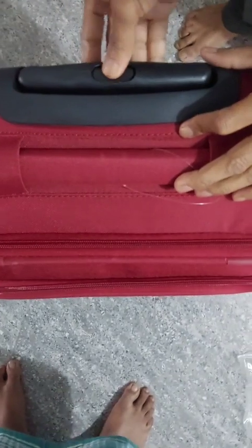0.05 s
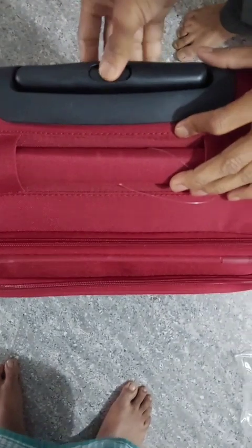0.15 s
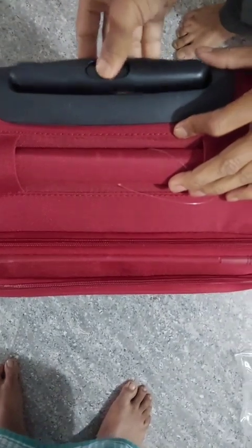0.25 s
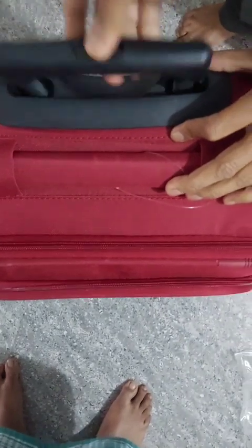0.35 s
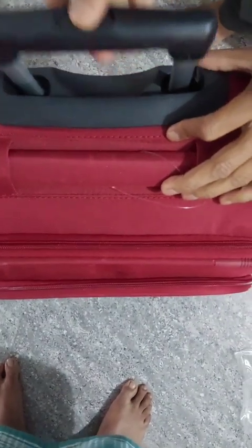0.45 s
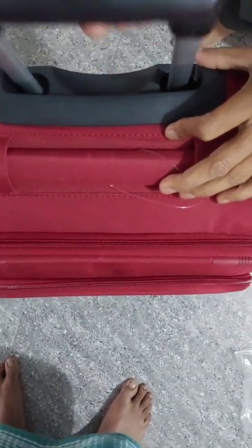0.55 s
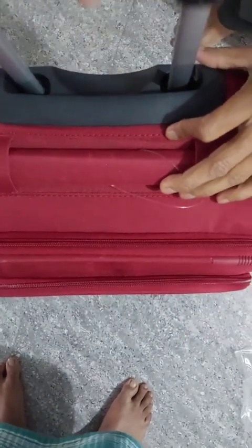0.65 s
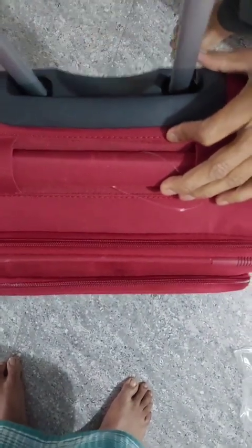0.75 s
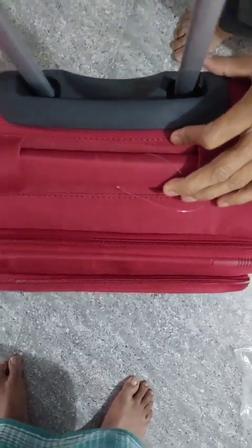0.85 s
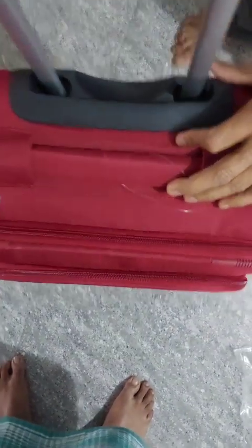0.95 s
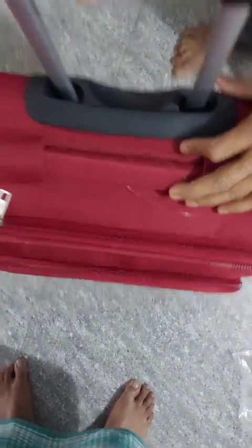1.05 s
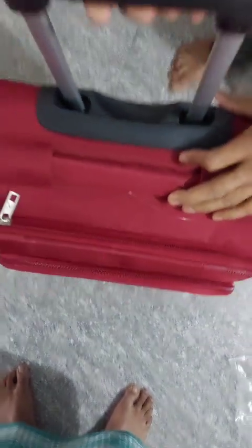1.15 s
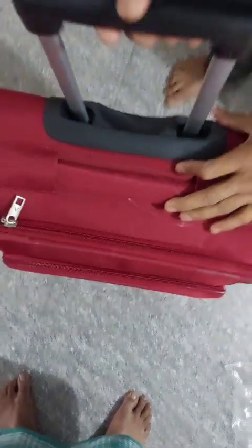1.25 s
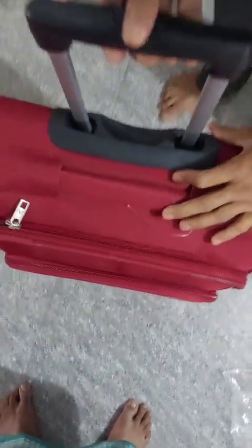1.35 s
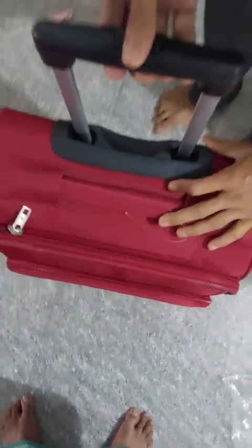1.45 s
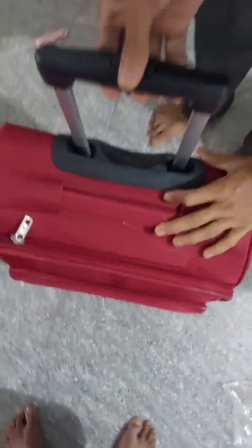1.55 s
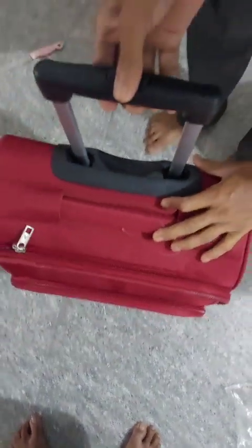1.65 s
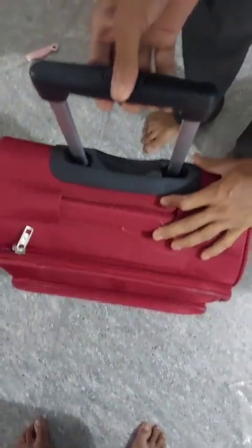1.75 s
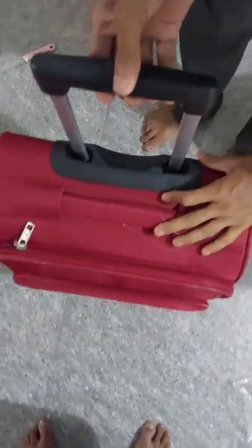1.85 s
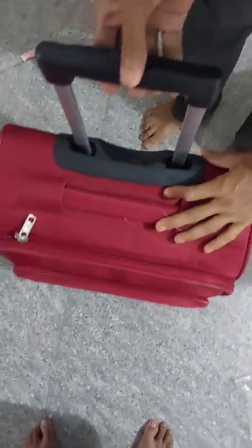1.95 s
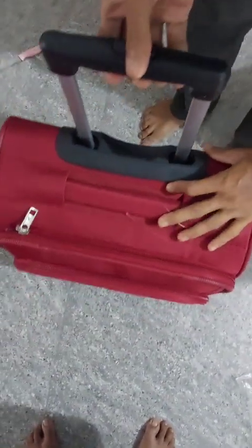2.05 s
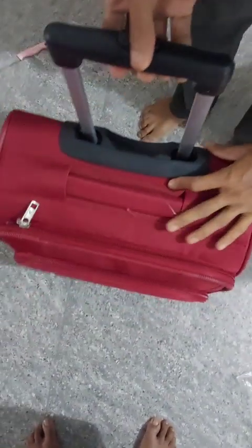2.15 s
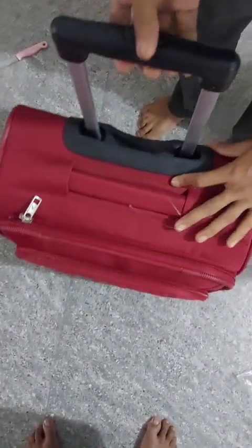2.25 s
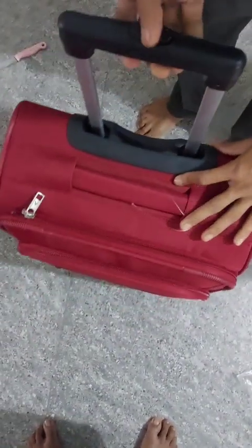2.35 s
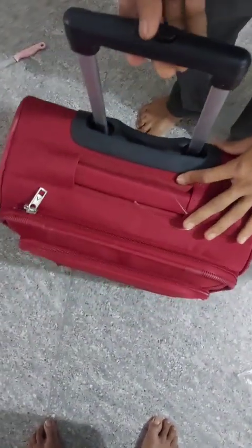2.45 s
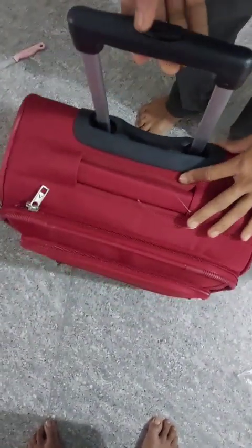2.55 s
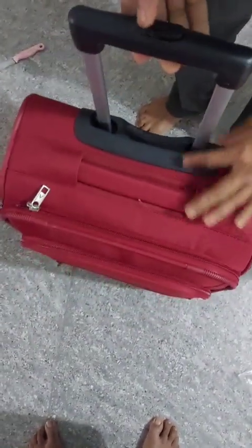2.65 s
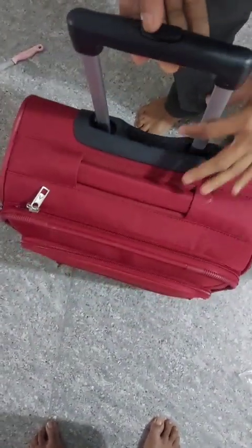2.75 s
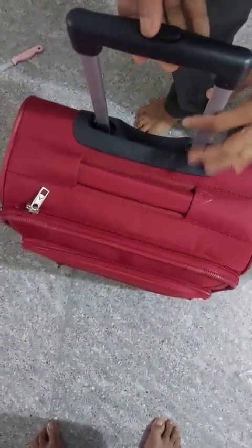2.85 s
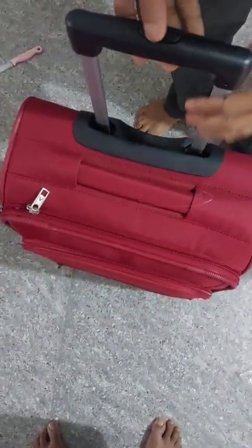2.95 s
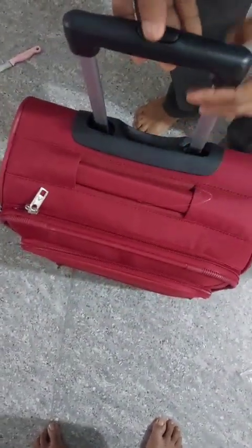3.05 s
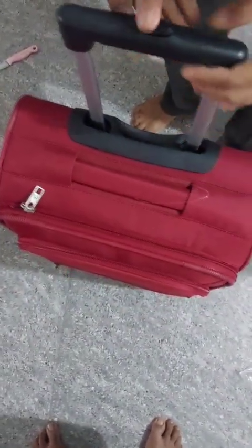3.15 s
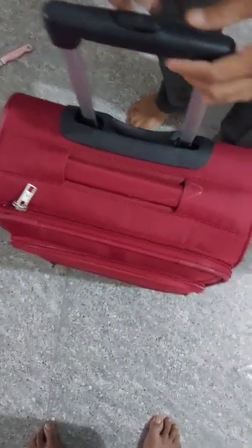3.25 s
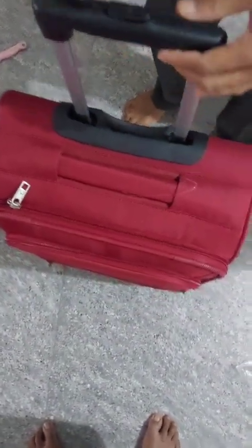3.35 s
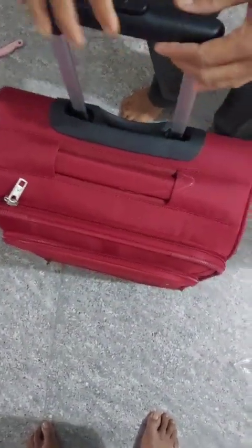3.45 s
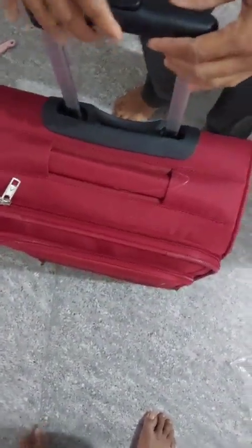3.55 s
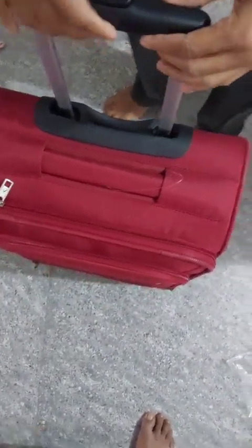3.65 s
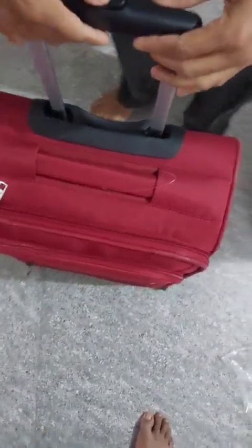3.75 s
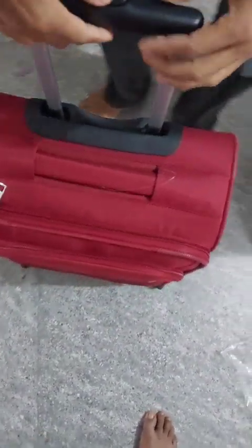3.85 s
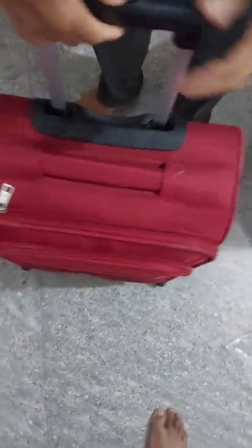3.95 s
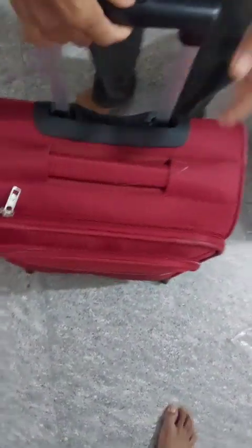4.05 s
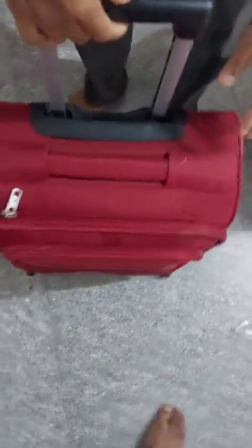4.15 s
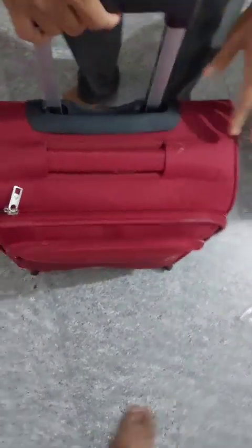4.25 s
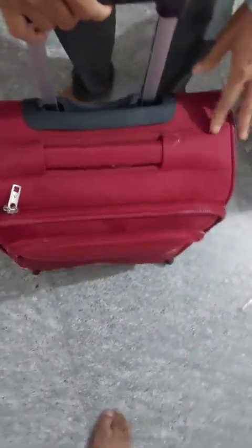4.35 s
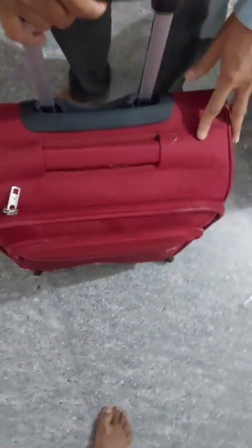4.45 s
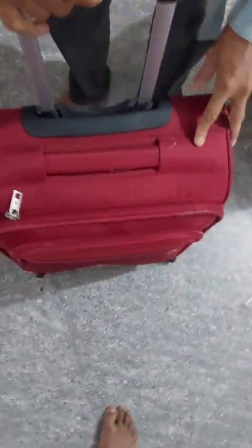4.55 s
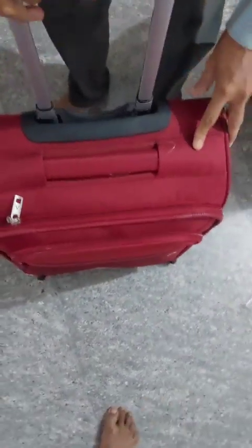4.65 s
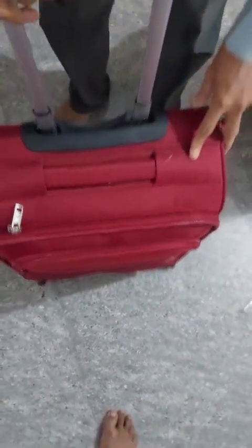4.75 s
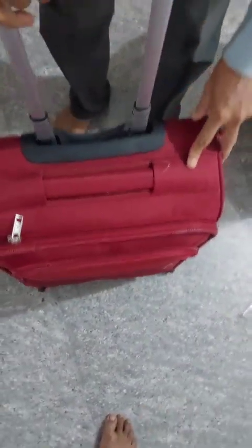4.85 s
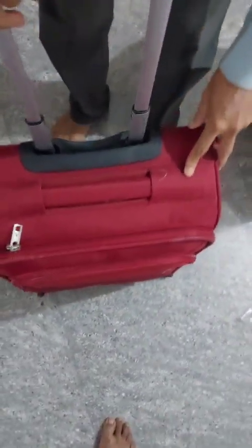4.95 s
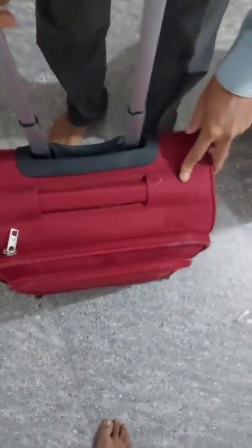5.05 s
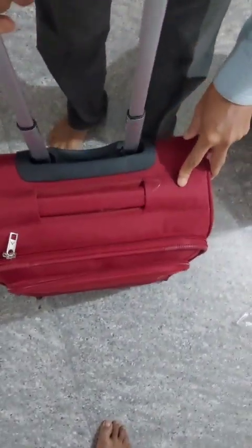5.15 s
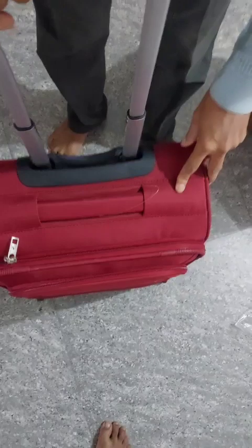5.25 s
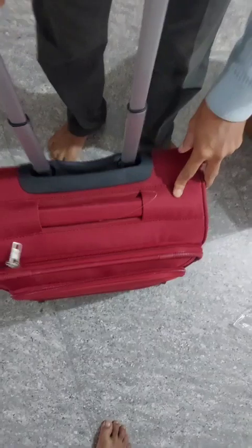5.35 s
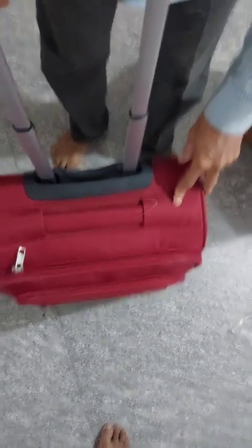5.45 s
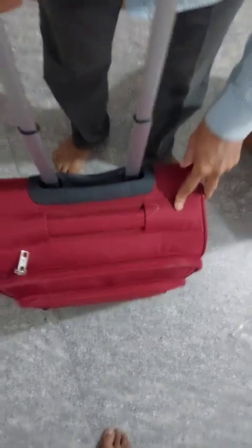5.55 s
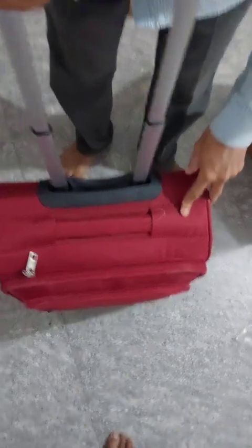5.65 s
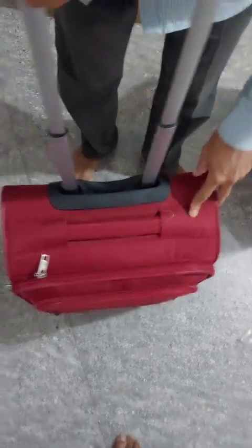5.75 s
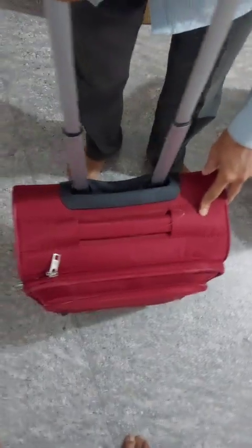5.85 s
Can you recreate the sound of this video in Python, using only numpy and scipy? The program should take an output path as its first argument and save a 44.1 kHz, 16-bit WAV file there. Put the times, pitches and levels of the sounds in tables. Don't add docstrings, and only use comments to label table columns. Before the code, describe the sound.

Close handling of a soft suitcase indoors: sliding tubes, sharp ringing clacks, quiet cloth rubbing, faint creaks, a short squeal and a rattling lock.

```python
import sys
import numpy as np
from scipy import signal
from scipy.fft import rfft, irfft
from scipy.io import wavfile
from scipy.ndimage import uniform_filter1d, map_coordinates

SR = 44100
rng = np.random.default_rng(int(sys.argv[2]) if len(sys.argv) > 2 else 0)


def gain_from_decibels(decibels):
    exponent = np.asarray(decibels, float) / 20
    return 10 ** exponent


def store_pcm(level_fs):
    pcm = np.round(np.clip(level_fs, -1, 1) * 32767).astype(np.int16)
    wavfile.write(sys.argv[1], SR, np.atleast_2d(pcm).T)


N = 259308
T = np.arange(N) / SR


def unit(x):
    return x / np.sqrt(np.mean(x ** 2))


def band(x, low_hz, high_hz):
    return signal.sosfilt(signal.butter(2, [low_hz, min(high_hz, .45 * SR)], "band", fs=SR, output="sos"), x)


def ring(x, modes):
    out, power = 0, 0
    for hz, width_hz, db in modes:
        b, a = signal.iirpeak(hz, hz / width_hz, fs=SR)
        out = out + gain_from_decibels(db) * signal.lfilter(b, a, x)
        power += gain_from_decibels(2 * db) * np.pi * width_hz / SR
    return out / np.sqrt(power)


def decay(t, t60_s):
    return np.exp(-np.log(1000) * t / t60_s)


def alike(noise, share):
    share = np.clip(share, 0, 1)
    return np.array([np.sqrt(share) * noise[1] + np.sqrt(1 - share) * noise[0], noise[1]])


def walk(rate_hz):
    k = int(SR / rate_hz)
    return uniform_filter1d(np.repeat(rng.standard_normal(N // k + 1), k), k)[:N]


def stroke(start, length, attack_s, release_db_s):
    gain = np.zeros(N)
    span = (T > start - attack_s) & (T < start + length + 70 / release_db_s)
    since = T[span] - start
    rise = np.clip(1 + since / attack_s, 0, 1) ** 2
    gain[span] = rise * gain_from_decibels(-release_db_s * np.clip(since - length, 0, 1))
    return gain


# frequency in Hz, density in dB per Hz.
AIR = [(15, -47), (25, -7.5), (70, 3.5), (270, -5.5), (796, -14), (962, -13), (2840, -21.5), (7710, -37.5),
       (9070, -26), (12500, -12.5), (16000, -29)]


def air():
    hz = np.maximum(np.fft.rfftfreq(N, 1 / SR), 1)
    table_hz, table_db = np.transpose(AIR)
    colour = gain_from_decibels(np.interp(np.log(hz), np.log(table_hz), table_db))
    colour = colour / (1 + (hz / 1500) ** 2) ** .25
    mid, side = rfft(rng.standard_normal((2, N)))
    side = side * np.clip(hz / 420.0, .7, 1)
    return gain_from_decibels(-70) * unit(irfft(colour * np.array([mid + side, mid - side]), N))


# start in seconds, length in seconds, scrape level in dB,
# extra cloth hiss in dB, extra weight on the case in dB.
SLIDES = [
    (.27, 0.1, -56.5, 0, 7),
    (.36, 0.24, -63, 16, 9),
    (.6, 0.2, -56.5, 11.5, 8.5),
    (4.59, 0.19, -58, -1.5, 8.5),
    (4.79, 0.13, -60, 1.5, 8),
    (4.91, 0.066, -57, 3.5, 3.5),
    (5.175, 0.045, -60, -1.5, -16),
    (5.21, 0.14, -59.5, 6, 1.5),
    (5.35, 0.076, -60.5, 9, 7),
]
SHUDDERS = [
    (.82, 0.12, -60.5, 7.5, 10.5),
    (1.42, 0.067, -48, -11, -6),
    (5.72, 0.17, -56.5, 6, 3),
]
BRUSHES = [(0.0, 0.061, -45, -15, 2), (1.22, 0.19, -64.5, 3.5, 3), (1.79, 0.12, -70.5, 0.5, 5),
           (2.15, 0.079, -67, 10.5, -4), (2.3, 0.16, -75, 7.5, -1.5), (2.61, 0.035, -61.5, 0.5, -2),
           (2.72, 0.092, -81.5, 6.5, 1), (2.85, 0.16, -65.5, -1, 3), (3.02, 0.25, -64.5, 0.5, 0.5),
           (3.55, 0.06, -57.5, -3, -1), (3.8, 0.079, -62, -15, -1), (3.93, 0.11, -71, -2, 6.5),
           (4.05, 0.089, -60, -4.5, 7), (4.2, 0.12, -62.5, -1.5, -13), (4.39, 0.4, -58, -2, -4.5),
           (5.0, 0.041, -64.5, -1.5, 4.5), (5.45, 0.008, -67.5, 4, 13), (5.55, 0.24, -73.5, 13, 4.5)]
SLIDE_MIX_DB, SHUDDER_MIX_DB, BRUSH_MIX_DB = (-7, 1, -8, -11.5), (0, 0, 0, -1), (-3, -12.5, -3, -12.5)
SLIDE_SHAPE, SHUDDER_SHAPE, BRUSH_SHAPE = (0.019, 1600), (0.0084, 134), (0.071, 167)
REST_DB = (-77, -95, -70.5, -93)


def effort():
    power = gain_from_decibels(2 * np.array(REST_DB))[:, None] * np.ones(N)
    gestures = ((SLIDES, SLIDE_MIX_DB, SLIDE_SHAPE),
                (SHUDDERS, SHUDDER_MIX_DB, SHUDDER_SHAPE),
                (BRUSHES, BRUSH_MIX_DB, BRUSH_SHAPE))
    for rows, mix_db, shape in gestures:
        for start, length, db, hiss_db, weight_db in rows:
            gains = gain_from_decibels(db + np.array(mix_db) + np.array([weight_db, 0, hiss_db, weight_db]))
            power = power + np.outer(gains ** 2, stroke(start, length, *shape) ** 2)
    return np.sqrt(power)


# frequency in Hz, width in Hz, level in dB.
CASE = [(134, 95, -7), (184.1, 16, -5), (245.9, 80, 1), (324, 6.7, -17.5), (440, 240, -12)]
SLIDE = [(1820, 170, 0), (2230, 220, -4), (2750, 500, -8), (3400, 500, -8)]
CLOTH = [(4000, 5300, -7.5), (6360, 5400, -5), (13500, 2600, 0.5)]
GUIDE = [(630.2, 425, 9.5), (818.7, 85, -6.5), (813, 82, -12), (1019, 6.5, -2)]


def rubbing():
    # modes, low Hz, high Hz, share alike at both ports
    parts = ((CASE, 50, 500, 0.46), (SLIDE, 1650, 3800, 0.049),
             (CLOTH, 3000, 17000, 0.066), (GUIDE, 450, 1500, 0.1))
    grain_db, flicker_db = 2.4, 1.3
    out = 0
    for gain, (modes, low_hz, high_hz, share) in zip(effort(), parts):
        unevenness = gain_from_decibels(grain_db * walk(200) + flicker_db * walk(30))
        grit = alike(rng.standard_normal((2, N)), share) * unevenness
        body = ring(grit, modes) + 0.089 * grit
        body = band(band(body, low_hz, high_hz), low_hz, high_hz)
        out = out + gain_from_decibels(-4.0) * gain * unit(body)
    arm = stroke(4.55, 1, *BRUSH_SHAPE)
    return out - 0.56 * arm * band(out, 6600, 19000)


# time in seconds, frequency in Hz,
# level in dB, t60 in seconds.
RINGS = [(.8075, 3600, -40, .03), (.8175, 1950, -26, .1), (.819, 2230, -29, .06), (.82, 1805, -40, .25),
         (.818, 2490, -27, .1), (.817, 2790, -23, .04), (.812, 7500, -30, .02), (.843, 7550, -29, .03),
         (.8875, 14500, -40, .01), (.823, 4870, -22, .015), (1.4165, 2170, -21, .04),
         (1.418, 2100, -26, .08), (1.442, 2130, -36, .2), (1.418, 2860, -36, .12), (1.418, 2245, -35, .15),
         (1.4175, 5300, -29, .03), (5.717, 6400, -32, .02), (5.8465, 4850, -25, .014)]
BOOMS = [(.07, 77, -55, .28), (.008, 235, -42, .15), (.072, 192, -35, .09), (.058, 720, -50, .12),
         (.105, 180, -48, .1), (.831, 71, -47, .35), (.858, 187, -44, .2), (.83, 746, -32, .2),
         (.84, 655, -29, .15), (1.42, 415, -45, .25), (1.417, 775, -39, .18), (4.598, 800, -49, .2),
         (4.61, 200, -36, .12), (4.645, 190, -40, .2), (4.76, 790, -55, .12), (5.72, 244, -36, .15),
         (5.767, 244, -38, .15)]
PINGS = [(.287, 7000, -50, .015), (.445, 13700, -58, .02), (.555, 14000, -58, .02),
         (1.295, 4000, -44, .025), (1.8, 3200, -71, .07), (2.875, 885, -67, .25), (2.944, 2080, -60, .08),
         (3.166, 1005, -67, .12), (3.17, 640, -66, .1), (3.3, 1990, -66, .06), (3.537, 2010, -53, .065),
         (4.053, 4400, -49, .027), (5.552, 6000, -62, .012)]
SHELL_LEFT_DB = -7


def pings():
    rows = RINGS + BOOMS + PINGS
    t = np.arange(SR // 4) / SR
    out = np.zeros((2, N + len(t)))
    for (s, hz, db, t60_s), shake in zip(rows, rng.standard_normal((len(rows), 2, 256))):
        shake = alike(shake, 300 / hz) * np.exp(-t[:256] / .0012)
        note = np.sin(2 * np.pi * hz * t) * decay(t, t60_s)
        note = signal.fftconvolve(note[None], shake, axes=1)[:, :len(t)]
        note = note / np.abs(note).max(axis=1, keepdims=True)
        left_db = SHELL_LEFT_DB if 500 < hz < 900 else 0
        i = int(s * SR)
        out[:, i:i + len(t)] += gain_from_decibels(db + np.array([[left_db], [0]])) * note
    return out[:, :N]


# time in seconds, tube level in dB,
# case thump in dB over the tube, crack in dB over the tube, rattle in milliseconds.
RELEASE = [(0.0129, -57, -1, -24, 2.5), (.037, -56, -1, -2, 5.3), (0.0579, -52, 7, -18, 1.7),
           (0.0749, -57, 4, 3, 3), (0.1074, -73, 12, -9, 2.8), (0.2589, -50, -1.5, -13, 0.98),
           (0.2787, -43, -12.5, -3.5, 9.1), (0.3036, -51, -4.5, 1.5, 10), (0.3529, -49.5, -23, -28, 1.4),
           (0.582, -32, -22, -5.5, 2.7), (0.5955, -31.5, -24, -2.5, 3), (0.599, -28, -23, -5, 4),
           (0.619, -43, -7, -12, 1.9), (.689, -50, -19, -9.5, 5), (0.7083, -44.5, -21, -20, 7.3)]
STOP = [(.806, -47, -30, -22, 8), (.8116, -21, -30, -4, 5), (.8170, -20, -33, 3, 2),
        (.822, -22, -25, -4, 8), (.831, -24, -25, -3, 7), (.8425, -23, -23, -1, 4),
        (.8468, -23, -21, -2, 3), (.856, -29, -22, -3, 12), (.887, -33, -21, -6, 5)]
CLACK = [(1.297, -56.5, -32.5, 4.5, 2.7), (1.4165, -22.5, -38, -5.5, 1.2), (1.4192, -19.5, -48, -2, 1.3),
         (1.4222, -26, -37.5, -4.5, 3.9), (1.434, -33, -20, -23.5, 5), (1.4405, -31, -15, -17.5, 5.6),
         (1.446, -34, -20, -7, 42), (1.8018, -68, 0, -16, 5.3), (1.899, -75, -9, 4, 8.1)]
TOUCH = [(2.6309, -75, -21, 18, 13), (2.86, -89, 17, -7, 22), (2.9426, -54, -12, -5, 8.9),
         (3.135, -67, -19, 3, 11), (3.158, -55.5, -16.5, -3.5, 18), (3.285, -57.5, -20, -1.5, 25),
         (3.5362, -50, -20.5, -3, 20), (3.5722, -41.5, -15, -12.5, 12.7), (3.8112, -59.5, -11, -21, 19),
         (3.9503, -57.5, -19, -21, 12.4), (4.0249, -60, -11, -3, 21), (4.0525, -46.5, -22, -3.5, 12.4)]
LOCK = [(4.565, -55, -5, -1, 24), (4.5853, -54.5, 7, -2, 2), (4.598, -39.5, -7.5, -22, 9.3),
        (4.6185, -40.5, 5.5, -36, 18), (4.6301, -49, -14, -13, 2), (4.6641, -48.5, -1, -17, 3),
        (4.6485, -49, 7, -25, 28), (4.72, -65, 8, -20, 3.7), (5.04, -64, 0, -20, 3.3)]
LATCH = [(5.6785, -67, -1, -12, 3), (5.7105, -37, -23, -3, 4.7), (5.7168, -29, -7, 3.5, 2.5),
         (5.722, -30, -19, 2.5, 8.6), (5.7285, -29, -14.5, -3.5, 19), (5.765, -38.5, -8, 0.5, 18),
         (5.829, -43, -13, -11, 13), (5.8462, -31, -7, 1, 7.2), (5.853, -40.5, -6.5, -10, 35)]
# frequency in Hz, width in Hz, level in dB.
TUBE_IN = [(1900, 340, -14), (2700, 500, 3.5), (3100, 88, 1.5), (3870, 74, -7), (4316, 990, 3)]
TUBE_STOP = [(1810, 100, 7.5), (1992, 150, 15.5), (2196, 200, 12), (2510, 180, 13), (2790, 120, 3.5),
             (3200, 1400, 0), (5030, 420, 5), (7300, 3000, -2), (9200, 1200, -7.5)]
TUBE_HALF = [(1300, 40, -12.5), (1590, 91, -1), (1950, 160, 1), (2035, 90, 9.5), (2183, 80, 11.5),
             (2340, 78, 1), (2497, 60, 4.5), (2834, 100, -3), (5050, 590, -4.5), (8760, 590, -17.5),
             (11500, 940, -15)]
TUBE_HELD = [(2000, 170, 18), (2500, 830, 11), (3300, 650, -7), (4650, 630, -14)]
TUBE_OUT = [(1400, 770, -4), (1920, 630, 25), (2370, 150, 19), (2680, 110, -21.5), (3430, 170, -29)]
TUBE_FULL = [(1490, 600, 9.8), (1900, 270, 11.6), (2250, 160, 11), (2717, 460, 4.4), (4900, 300, 2.8),
             (6600, 450, 4.4), (11400, 4000, 4.8)]
# frequency in Hz, width in Hz, level in dB.
SHELL = [(534, 55, 6.5), (652, 93, 7.5), (740, 390, 3.5), (900, 590, -17), (1030, 1000, -18)]
CRACK = [(5070, 1300, 0.5), (6030, 4400, 8), (7400, 770, -4), (11800, 7100, -15.5), (13000, 8000, 5),
         (14300, 3400, -9.5)]
SHELL_OVER_CASE_DB = (-2, 11, -4.5, 6, -16, -5)


def hits():
    stages = ((RELEASE, TUBE_IN), (STOP, TUBE_STOP), (CLACK, TUBE_HALF),
              (TOUCH, TUBE_HELD), (LOCK, TUBE_OUT), (LATCH, TUBE_FULL))
    n = 4096
    ms = np.arange(n) / SR * 1000
    snap = 1.68 * np.exp(-ms / 2)
    soft = ms / 14 * np.exp(1 - ms / 14)
    port_share = np.array([[.4], [.8], [.45], [.2]])
    drive = np.zeros((2, 3, N + n))
    tubes = np.zeros((2, N + 3 * n))
    for (table, tube), shell_db in zip(stages, SHELL_OVER_CASE_DB):
        chatter = rng.standard_normal((len(table), 2, 4, n))
        for (s, db, case_db, crack_db, rattle_ms), noise in zip(table, chatter):
            sharp = (np.exp(-ms / rattle_ms) + snap) * (1 - np.exp(-ms / (0.14 * rattle_ms)))
            push = np.array([sharp, soft, np.sqrt(sharp * soft) + sharp, sharp])
            gains = gain_from_decibels(db - 3 + np.array([0, case_db, case_db + shell_db, crack_db]))
            push = gains[:, None] * push * alike(noise, port_share)
            i = int(s * SR)
            drive[..., i:i + n] += push[:, 1:]
            tubes[:, i:i + 3 * n] += ring(np.pad(push[:, 0], ((0, 0), (0, 2 * n))), tube)
    case, shell, crack = (ring(drive[:, k, :N], modes) for k, modes in enumerate((CASE, SHELL, CRACK)))
    case = band(band(case, 110, 600), 110, 600)
    shell = gain_from_decibels(np.array([[SHELL_LEFT_DB], [0]])) * band(shell, 400, 1400)
    return tubes[:, :N] + case + shell + band(crack, 3400, 19000)


def wobble(rate_hz):
    slow = signal.butter(2, rate_hz, fs=SR, output="sos")
    return unit(signal.sosfilt(slow, rng.standard_normal((2, N))))


def slip(rows, wobble_hz, tone, overtone_db):
    attack_s, release_db_s = .022, 480
    out = np.zeros(N)
    waver = wobble(wobble_hz)
    for start, length, first_hz, last_hz, db in rows:
        span = slice(max(int((start - attack_s) * SR), 0), int((start + length) * SR) + SR // 5)
        hz = np.interp(T[span], [start, start + length], [first_hz, last_hz])
        turn = 2 * np.pi * np.cumsum(hz) / SR
        a, b = waver[:, span]
        voice = (tone + a) * np.cos(turn) + b * np.sin(turn)
        voice = voice + gain_from_decibels(overtone_db) * (tone + b) * np.cos(2 * turn)
        gain = gain_from_decibels(db) * stroke(start, length, attack_s, release_db_s)[span]
        out[span] += gain * voice / np.sqrt(1 + tone ** 2 / 2)
    return out


# start in seconds, length in seconds, first pitch in Hz,
# last pitch in Hz, level in dB.
SCRAPE = [(4.6, .05, 1760, 1740, -57), (4.67, .12, 1790, 1900, -63), (4.8, .2, 1880, 1960, -69),
          (4.92, .035, 2240, 2310, -59), (5.22, .08, 1980, 1900, -71), (5.38, .035, 2230, 2180, -60),
          (5.39, .03, 1750, 1740, -61), (.285, .045, 1780, 1770, -53), (1.0, .06, 1820, 1800, -72),
          (1.18, .2, 1850, 1950, -70), (3.95, .08, 1950, 1940, -75)]


def scrape():
    return slip(SCRAPE, wobble_hz=89, tone=0.38, overtone_db=-34.5)


# start in seconds, length in seconds, first pitch in Hz, last pitch in Hz,
# level in dB.
SQUEAK = [(4.668, 0.033, 3040, 3080, -55.5), (4.76, 0.018, 3420, 3430, -63), (4.93, 0.042, 3480, 3300, -59),
          (.6, 0.035, 2700, 2680, -53), (.69, 0.043, 2744, 2890, -57), (.745, .04, 2636, 2700, -65),
          (5.01, 0.13, 3220, 3300, -60), (5.38, 0.063, 3300, 3200, -64), (5.552, 0.02, 3200, 3130, -52.5),
          (5.59, 0.047, 3200, 3014, -66.5), (5.682, 0.024, 3090, 2990, -57.5)]


def squeak():
    return slip(SQUEAK, wobble_hz=130, tone=.1, overtone_db=-26)


# frequency in Hz, level in dB.
ZIP_MODES = [(7900, 6), (8850, 4), (9400, -4), (12300, -6.5), (12750, 5), (13500, 5), (14400, -2),
             (15300, 8)]
# time in seconds, level in dB.
ZIP_TAPS = [(.93, -66), (.972, -67), (1.02, -72), (1.045, -65.5), (1.07, -70), (1.76, -80.5), (1.85, -80),
            (1.899, -61), (1.92, -65), (1.965, -73.5), (2.021, -73), (5.55, -73)]


def zips():
    t60_s, scatter_db, detune_share = .07, 5, 0.0028
    t = np.arange(SR // 4) / SR
    out = np.zeros(N + len(t))
    hz, mode_db = np.transpose(ZIP_MODES)
    draws = rng.standard_normal((len(ZIP_TAPS), 3, len(hz)))
    for (s, db), (size, detune, turn) in zip(ZIP_TAPS, draws):
        waves = np.sin(2 * np.pi * np.outer(t, hz * (1 + detune_share * detune)) + 10 * turn)
        notes = waves @ gain_from_decibels(db + mode_db + scatter_db * size)
        i = int(s * SR)
        out[i:i + len(t)] += notes * decay(t, t60_s) * np.clip(t / 0.0017, 0, 1)
    return out[:N]


# start in seconds, length in seconds, first pitch in Hz,
# last pitch in Hz, level in dB.
HUM = [
    (1.1, 0.1, 900, 934, -72),
    (1.22, 0.16, 906, 987, -67.5),
    (2.16, 0.33, 1109, 1057, -80),
]


def hum():
    return slip(HUM, wobble_hz=140, tone=.05, overtone_db=-6)


# start in seconds, length in seconds, first pitch in Hz,
# last pitch in Hz, level in dB.
CREAK = [(2.44, 0.099, 433, 418, -76), (2.56, 0.028, 418, 415, -61), (2.83, 0.037, 340, 370, -72.5),
         (2.89, 0.065, 379, 400, -61), (3.0, 0.038, 386, 400, -69), (3.1, 0.08, 389, 365, -68.5),
         (3.19, 0.073, 367.6, 408, -65), (3.24, 0.07, 542, 591, -71), (3.26, 0.038, 487, 504, -71),
         (3.31, 0.03, 467, 465, -70.5), (3.3, 0.021, 349, 316, -69), (2.43, 0.22, 1063, 1070, -81.5),
         (2.59, .06, 874, 925, -81)]


def creak():
    return slip(CREAK, wobble_hz=30.8, tone=1.64, overtone_db=-35)


# start in seconds, length in seconds, first pitch in Hz, last pitch in Hz,
# level in dB.
SQUEAL = [
    (3.94, 0.045, 12220, 13500, -89),
    (4.0, 0.034, 13550, 12800, -80),
]


def squeal():
    return slip(SQUEAL, wobble_hz=29.9, tone=1.5, overtone_db=-90)


# time in seconds, pitch in Hz, level in dB.
WHISTLE = [(4.65, 3383, -85), (4.668, 3360, -56), (4.72, 3450, -67), (4.75, 3460, -67), (4.79, 3520, -52.5),
           (4.82, 3546, -71), (4.88, 3600, -75), (4.897, 3558, -44), (4.921, 3586, -34), (4.93, 3570, -50),
           (4.96, 3575, -62), (5.0, 3620, -79.5), (5.044, 3620, -61), (5.075, 3530, -91), (5.34, 3490, -90),
           (5.38, 3540, -59), (5.46, 3660, -66), (5.5, 3670, -100)]


def whistle():
    s, hz, db = np.transpose(WHISTLE)
    a, b = .15 * wobble(45)
    turn = 2 * np.pi * np.cumsum(np.interp(T, s, hz)) / SR
    voice = (1 + a) * np.cos(turn) + b * np.sin(turn) + gain_from_decibels(-26) * (1 + 3 * b) * np.cos(2 * turn)
    return gain_from_decibels(np.interp(T, s, db, left=-120, right=-120)) * voice * np.sqrt(2)


# time in seconds, lag in samples.
LAG = [(0, 12), (.8, 11), (1.4, 8), (2.9, 11), (4.1, 12), (4.6, 7), (4.8, 9), (5.08, 9), (5.2, 4), (5.9, 3)]


def ports(pair):
    bass = signal.sosfiltfilt(signal.butter(2, 380, fs=SR, output="sos"), pair[0])
    heard_at = np.arange(N) - np.interp(T, *np.transpose(LAG))
    left = bass + map_coordinates(pair[0] - bass, [heard_at])
    left = left - 0.56 * band(left, 7100, 21000)
    return np.array([gain_from_decibels(0.33) * left, pair[1]])


# centre in Hz, t60 in seconds, level in dB.
ROOM = [(157, 0.42, -1.5), (400, 0.14, 4.5), (1060, 0.13, 8.5), (2200, 0.34, 11), (5500, 0.24, 15.5),
        (11060, 0.21, -6.5)]


def room(x):
    t = np.arange(SR // 2) / SR
    tail = 0
    for hz, t60_s, db in ROOM:
        mid, side = (unit(band(rng.standard_normal(len(t)), hz / 2.0, hz * 1.73)) for _ in range(2))
        both = mid + min(hz / 460.0, 1) * side * np.array([[1], [-1]])
        tail = tail + gain_from_decibels(db) * both * decay(t, t60_s) / np.sqrt(t60_s * SR * 40)
    tail = tail * np.clip((t - .002) / 0.015, 0, 1)
    return signal.fftconvolve(x[None], tail, axes=1)[:, :N]


def scene():
    near = rubbing() + pings() + hits() + zips()
    near = near + scrape() + squeak() + hum() + creak() + squeal() + whistle()
    return ports(near) + room(near[1]) + air()


# start in seconds, length in seconds, low edge in Hz,
# high edge in Hz, share removed.
LULLS = [(0.135, 0.086, 1070, 4070, 0.49), (1.663, 0.09, 6960, 16670, 0.52),
         (1.711, 0.53, 3120, 7080, 0.49), (2.38, 0.35, 2370, 5900, 0.47), (2.7, 0.043, 8000, 16550, 0.6),
         (3.405, 0.11, 4000, 16700, 0.58), (3.659, 0.11, 6500, 16400, 0.52), (4.169, 0.32, 2000, 5150, 0.6),
         (5.076, 0.12, 1300, 2860, 0.26), (5.473, 0.06, 4000, 12000, 0.29)]


def gate(x):
    cut = np.zeros(x.shape)
    for start, length, low_hz, high_hz, share in LULLS:
        span = slice(max(int(start * SR) - SR // 10, 0), int((start + length) * SR) + SR // 5)
        edges = signal.butter(2, [low_hz, high_hz], "band", fs=SR, output="sos")
        part = signal.sosfiltfilt(edges, x[:, span])
        cut[:, span] += share * stroke(start, length, 0.06, 1200)[span] * part
    return x - cut


def band_limit(x):
    return signal.sosfilt(signal.butter(12, 16980, fs=SR, output="sos"), x)


def record(dry):
    dry = gate(dry)
    dry = dry - 0.3 * signal.lfilter(*signal.iirpeak(8900, 6.0, fs=SR), dry)
    dry = signal.sosfilt(signal.butter(2, 40, "high", fs=SR, output="sos"), dry)
    top = signal.sosfiltfilt(signal.ellip(8, .1, 60, 15800, "high", fs=SR, output="sos"), dry)
    return band_limit(dry - top)


dry = scene()
out = record(dry)
store_pcm(out)
```